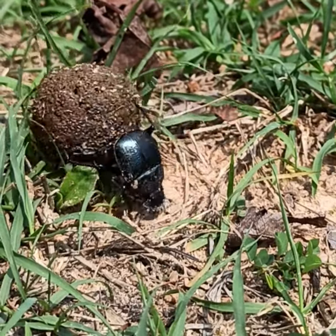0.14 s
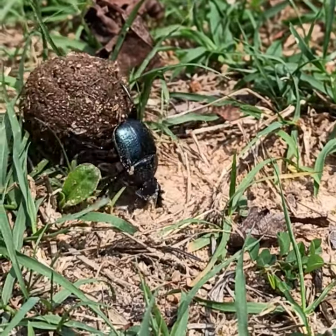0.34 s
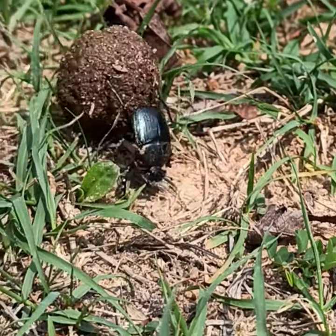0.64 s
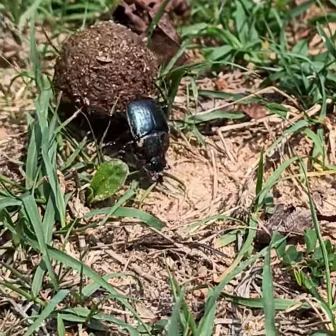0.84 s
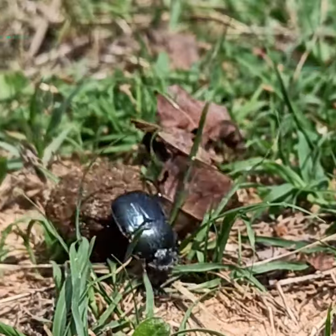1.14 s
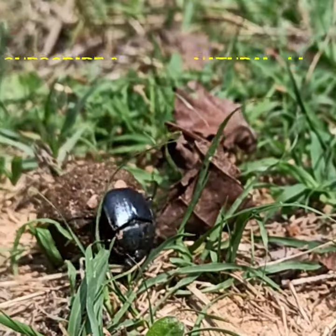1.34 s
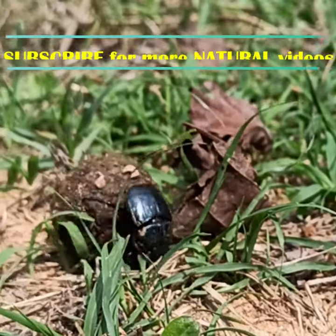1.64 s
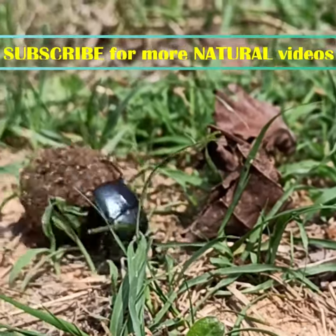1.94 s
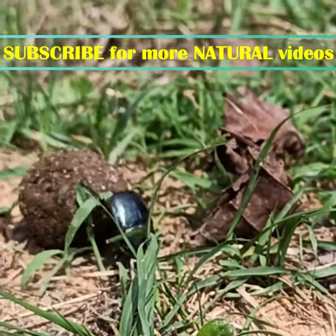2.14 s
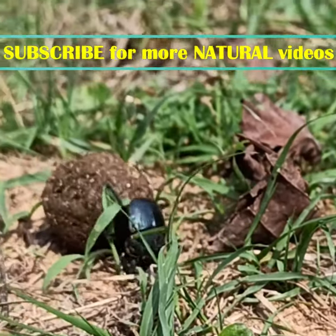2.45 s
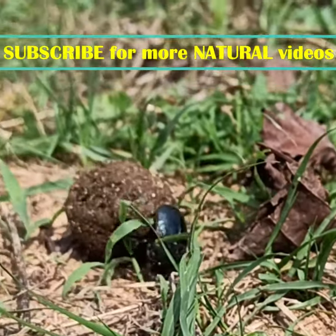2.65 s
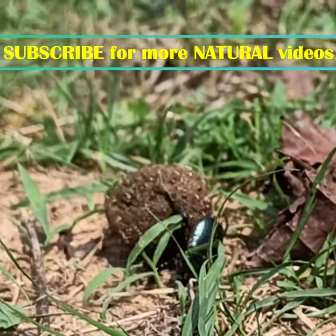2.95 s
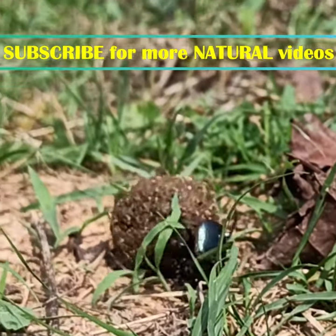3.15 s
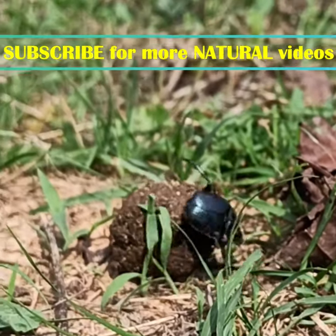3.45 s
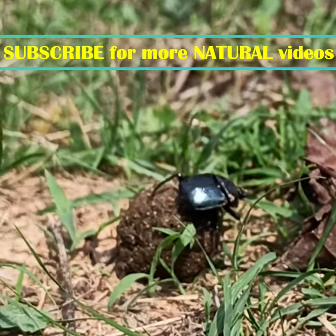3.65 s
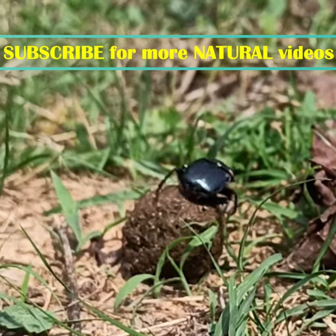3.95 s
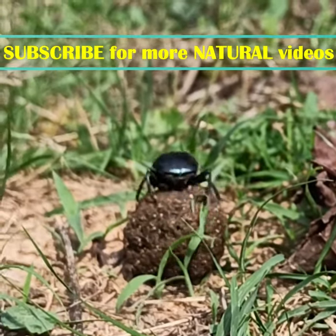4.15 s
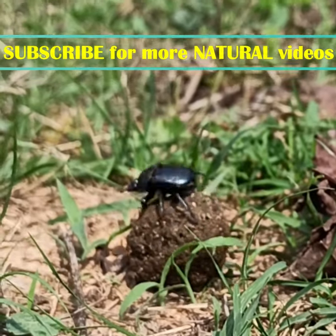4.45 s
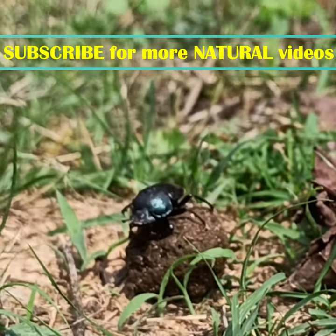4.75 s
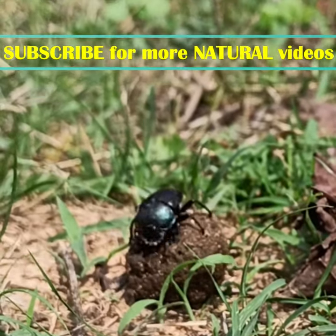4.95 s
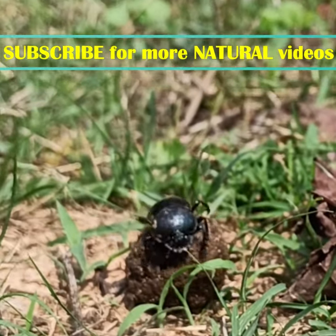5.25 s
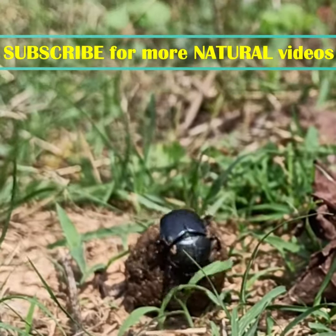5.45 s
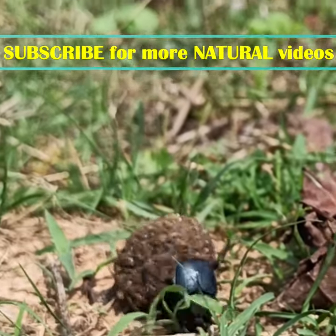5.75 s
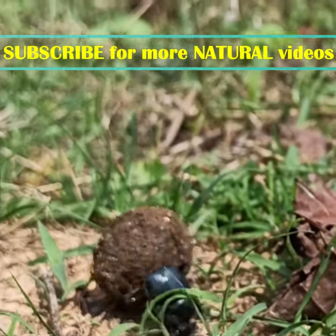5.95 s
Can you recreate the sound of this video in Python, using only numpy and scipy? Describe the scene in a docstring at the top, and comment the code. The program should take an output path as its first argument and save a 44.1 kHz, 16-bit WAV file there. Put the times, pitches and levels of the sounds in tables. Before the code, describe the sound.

A daytime grassy field heard by a small microphone near the ground, as a beetle rolls a ball of dung through dry blades. A faint steady hiss, lumpy low wind and a chorus of tiny far chirps continue throughout; nearer birds add short gliding whistles. From 0.3 to 1 second an insect hums by, low and sinking, with tiny grass ticks. A crack comes at 1.4, more from 2 seconds, clustering around 2.4 to 2.6 with rustle. Near 3.3 a bright tick and a very sharp, ringing snap are the loudest moment. Light ticks follow, with a soft low bump at 3.8. From 4.05 to 4.9 crackling and scraping thicken, strongest at 4.64 and 4.82, with dull rubs. After a lull near 5.2, another crackling burst comes at 5.4 to 5.65. Birds continue, and a faint hum returns from 5.9 to the end.

```python
"""A grassy field by day, heard by a small microphone held near the ground.
Far birds whistle and chirp as gliding sines; dry grass rustles as clouds of filtered clicks and noise.
Stalks tick and blades crack as struck resonances; an insect hums past twice on a few harmonics.
Light wind rumbles as lumpy low noise over the field's hiss; the hand bumps the housing; dull rubs pass.
The microphone port's ring near 3 kHz colours the rustle, the cracks and the farther birds."""
import sys
import numpy as np
from scipy import signal
from scipy.io import wavfile
from scipy.ndimage import uniform_filter1d

SR = 44100
rng = np.random.default_rng(int(sys.argv[2]) if len(sys.argv) > 2 else 0)


def store_wav(level_fs):
    """Save 16-bit WAV to argv[1]."""
    pcm = np.round(np.clip(np.atleast_2d(level_fs), -1, 1) * 32767)
    wavfile.write(sys.argv[1], SR, pcm.T.astype(np.int16))


N = 268569

# How the grass moves. Each row: time in seconds, rustle level in dB, treble level in dB.
GRASS_MOTION = [(0, -61, -86), (.3, -65, -88.5), (.8, -61, -82.5), (1.25, -57, -81), (1.66, -63, -80.5),
                (2.09, -56.5, -82), (2.38, -58, -82.5), (2.53, -50, -75), (2.7, -61, -80), (3, -59, -80.5),
                (3.34, -51.5, -72), (3.53, -60, -76), (3.8, -54.5, -77.5), (4, -60, -80), (4.2, -57, -73),
                (4.56, -60.5, -78), (4.75, -54, -69), (4.9, -53.5, -76.5), (5.11, -64, -86),
                (5.34, -60, -83), (5.51, -52, -68), (5.8, -57.5, -77), (5.95, -53.5, -75),
                (6.09, -60, -82.5)]
# Grass heard through the port's ring. Each row: frequency in Hz, gain in dB.
PORT_SPECTRUM = [(530, -35), (900, -16.5), (1350, -22.5), (1480, -24.5), (1990, -10.5), (2790, 1.5),
                 (3220, 2), (4280, -13.5), (4680, -44.5), (5400, -57), (7020, -60), (11900, -120)]
# Treble of the grass. Each row: frequency in Hz, gain in dB.
SHEEN_SPECTRUM = [(3060, -26), (5200, -12), (5990, -8), (7040, 2.5), (8100, -2), (9520, 2), (10900, 0),
                  (12800, -8.5), (15700, -24), (16200, -30), (16700, -36)]


def gain_of(db):
    """Turns decibels into gain."""
    return 10 ** (np.asarray(db) / 20)


def evened(x):
    """Scales to rms 1."""
    return x / np.sqrt(np.mean(x ** 2) + 1e-20)


def peaked(x):
    """Scales to peak 1."""
    return x / (abs(x).max() + 1e-20)


def add(mix, s, sound):
    """Mixes a sound in at s seconds."""
    part = mix[max(round(s * SR), 0):][:len(sound)]
    part += sound[:len(part)]


def colour(points, size=4096):
    """Makes causal, minimum-phase filter taps with the given spectrum."""
    f, db = np.transpose(points)
    hz = abs(np.fft.fftfreq(size, 1 / SR))
    shape_db = np.interp(np.log(hz + 1), np.log(f), db)
    log_gain = np.log(gain_of(np.maximum(shape_db, -100)))
    spectrum = np.exp(np.conj(signal.hilbert(log_gain)))
    return np.fft.ifft(spectrum).real[:size // 2]


def through(x, taps):
    """Filters and keeps the length."""
    return signal.oaconvolve(x, taps)[:len(x)]


def ring(x, hz, width_hz):
    """Passes a sound through one resonance."""
    return signal.lfilter(*signal.iirpeak(hz, hz / width_hz, SR), x)


def smoothed(x, cutoff_hz):
    """Keeps only the slow movement of a signal."""
    return signal.sosfilt(signal.butter(2, cutoff_hz, fs=SR, output="sos"), x)


def curve(rows, column):
    """Reads a column of a table at every sample."""
    rows = np.asarray(rows)
    return np.interp(np.arange(N) / SR, rows[:, 0], rows[:, column])


def hiss(points, patchy_db):
    """Noise of a given spectrum whose loudness drifts in patches of time and pitch."""
    f, db = np.transpose(points)
    hz = np.fft.rfftfreq(1024, 1 / SR)
    a, b, patches = rng.standard_normal((N // 256 + 5, 513, 3)).T
    patches = uniform_filter1d(patches, size=12, axis=0)  # across pitch
    patches = evened(uniform_filter1d(patches, size=12, axis=1))  # across time
    shape_db = np.interp(np.log(hz + 1), np.log(f), db)[:, None] + patchy_db * patches
    frames = (a + 1j * b) * gain_of(shape_db)
    return evened(signal.istft(frames, nperseg=1024, noverlap=768)[1][:N])


def grains(per_s, spread_db):
    """Sparse clicks of random sign, a few of them large."""
    size = gain_of(spread_db * np.minimum(rng.exponential(1, N), 4))
    present = rng.random(N) < per_s / SR
    return evened(size * rng.standard_normal(N) * present)


def grain(points, lo_hz, hi_hz, width_hz, per_s, spread_db, blur, count=6):
    """Clicks of many blades, each kind with its own pitch, over a blur of farther ones."""
    near = np.zeros(N)
    for hz in np.geomspace(lo_hz, hi_hz, count):
        near += evened(ring(grains(per_s / count, spread_db), hz, width_hz))
    near = evened(through(near, colour(points)))
    return evened(near + blur * hiss(points, patchy_db=3.5))


def scattered(column, ranges, count):
    """Small events at chance moments, more where the grass moves most; values drawn within ranges."""
    draw = rng.random((count, 1 + len(ranges)))
    lo, hi = np.transpose(ranges)
    busy = np.cumsum(gain_of(curve(GRASS_MOTION, column)) ** 3)
    times = np.searchsorted(busy / busy[-1], draw[:, 0]) / SR
    return np.c_[times, lo + (hi - lo) * draw[:, 1:]]


def field_air(level_db=-62.5):
    """Far hiss of the field: steady noise with gently drifting patches."""
    # Each row: frequency in Hz, gain in dB.
    air_spectrum = [(59, -58), (100, -3.5), (702, -10), (1330, -11.5), (1980, -7), (2450, 0), (2900, -9.5),
                    (3660, -17.5), (4820, -26), (6770, -25), (9500, -32), (15800, -36)]
    return gain_of(level_db) * hiss(air_spectrum, patchy_db=1.42)


def wind(lumps_hz=4.6, lumps_db=2.5):
    """Lumpy low pressure on the membrane: a slow level with quick chance lumps on it."""
    # Each row: time in seconds, level in dB before the lumps.
    wind_levels = [(0, -69.5), (.25, -72), (.45, -67.5), (.75, -67), (1.07, -72.5), (1.3, -66.5),
                   (2.3, -69), (2.65, -73), (2.8, -70), (3.3, -74), (3.5, -67.5), (4.2, -67.5), (4.35, -71),
                   (4.5, -65), (4.9, -68), (5.2, -67.5), (5.35, -70.5), (6.09, -71.5)]
    # Each row: frequency in Hz, gain in dB.
    gust_spectrum = [(18, -43), (30, -20), (50, 1), (81, 3.5), (97, -5.5), (119, -12), (196, -12.5),
                     (277, -14), (400, -21), (520, -41), (880, -120)]
    lumps = evened(smoothed(rng.standard_normal(N), lumps_hz))
    level_db = curve(wind_levels, column=1) + lumps_db * lumps
    return gain_of(level_db) * hiss(gust_spectrum, patchy_db=-0.5)


def birds(echo_db=-1.5, t60=1.0, scatter=0.02, flutter=1.0, flutter_hz=45.0, echo_hz=2000.0):
    """Gliding sines flutter in moving air; leaves scatter the first arrival and echo the high notes."""
    # Each row: start in seconds, length in seconds, first and last pitch in Hz,
    # level in dB with the note's own flutter, before the fades and the echo.
    whistles = [(0, .2, 2400, 2362, -55.5), (0.061, 0.097, 1760, 1950, -69),
                (0.195, 0.062, 2620, 2350, -56), (0.182, 0.043, 2845, 3000, -55),
                (0.356, 0.035, 2960, 2800, -54), (.615, 0.048, 3690, 4610, -74),
                (.732, 0.033, 2200, 2406, -62), (0.766, 0.026, 3200, 2654, -55),
                (.803, 0.043, 2944, 2760, -64), (.98, .08, 3250, 3170, -65), (1.111, .072, 1990, 2096, -63),
                (1.16, 0.16, 2540, 2410, -62), (1.273, 0.046, 1500, 1450, -58.5),
                (1.327, 0.02, 1525, 1580, -59), (1.406, .054, 2630, 2696, -58),
                (1.516, .21, 3650, 3720, -64.5), (1.64, .08, 2750, 2880, -59), (1.775, .1, 2815, 3075, -65),
                (2.107, 0.05, 2110, 2030, -63), (2.231, 0.077, 2180, 2100, -57),
                (2.292, 0.062, 1910, 1880, -61.5), (2.45, 0.11, 1860, 1825, -67),
                (2.705, 0.16, 1950, 2502, -52.5), (2.877, 0.039, 2524, 2834, -52),
                (2.987, .042, 5560, 6040, -79), (3.42, .12, 2497, 2520, -62),
                (3.647, 0.045, 5900, 6700, -75), (3.695, .26, 4023, 3567, -58),
                (3.86, .097, 2270, 2200, -64), (3.968, 0.067, 3760, 3720, -67),
                (4.022, .035, 7140, 6900, -83), (4.035, 0.031, 3330, 2980, -51.5),
                (4.663, .045, 1390, 1536, -60), (4.689, .05, 2230, 2270, -60),
                (4.84, 0.029, 2190, 2220, -49.5), (4.903, 0.14, 3670, 3780, -70.5),
                (5.023, 0.029, 2780, 2750, -53), (5.27, 0.087, 2200, 2136, -63),
                (5.316, 0.042, 7550, 6080, -74), (5.343, 0.068, 2010, 1967, -58.5),
                (5.6, 0.21, 1857, 1886, -71.5), (5.66, 0.058, 3130, 3245, -53.5),
                (5.775, .14, 1950, 2444, -55), (5.917, .13, 2367, 2467, -57.5),
                (6.06, 0.034, 6880, 7150, -74)]
    rise_s = .023  # time constant of a rising note; a falling one slides over its whole length
    dry = np.zeros(N)
    noises = rng.standard_normal((len(whistles), 2, SR // 2))
    for (s, length, first_hz, last_hz, db), (a, b) in zip(whistles, noises):
        t = np.arange(0, length, 1 / SR)
        glide = np.exp(-t / rise_s) if last_hz > first_hz else 1 - t / length
        hz = last_hz + (first_hz - last_hz) * glide
        wander = smoothed(a + 1j * b, flutter_hz)[-len(t):]
        wander /= np.sqrt(np.mean(abs(wander) ** 2))
        path = 1 + flutter * wander  # a direct path plus a wandering one
        note = evened((path * np.exp(2j * np.pi * np.cumsum(hz) / SR)).real)
        add(dry, s, gain_of(db) * note * signal.windows.tukey(len(t), .3))
    t = np.arange(SR) / SR
    near = rng.standard_normal(SR) * np.exp(-t / scatter)
    tail = rng.standard_normal(SR) * gain_of(-60 * t / t60)
    high_pass = signal.butter(4, echo_hz, "highpass", fs=SR, output="sos")
    tail = signal.sosfilt(high_pass, tail / np.linalg.norm(tail))
    sway = evened(smoothed(rng.standard_normal(N), flutter_hz))  # moving leaves blur the echo
    first = dry + through(dry, 0.74 * near / np.linalg.norm(near))
    return first + gain_of(echo_db) * sway * through(dry, tail)


def chorus(level_db=-65.5, shortest=0.019, longest=0.04, sweep=0.1005, count=600):
    """Farther birds: many faint short chirps of chance pitch, heard through the port's ring."""
    out = np.zeros(N)
    for when, pitch, length, bend, size in rng.random((count, 5)):
        t = np.arange(0, shortest + (longest - shortest) * length, 1 / SR)
        middle_hz = 1900 * (4000 / 1900) ** pitch
        hz = middle_hz * (1 + sweep * (2 * bend - 1) * t / t[-1])
        chirp = np.hanning(len(t)) * np.sin(2 * np.pi * np.cumsum(hz) / SR)
        add(out, when * N / SR, gain_of(-8 * size) * chirp)
    return gain_of(level_db) * evened(through(out, colour(PORT_SPECTRUM)))


def rustle():
    """A slow rustle follows the motion; scrapes are short swells of the same grain with a lower body."""
    # Blades dragged past each other. Each row: start in seconds, length in seconds,
    # ring level in dB, treble level in dB, low body level in dB.
    drags = [(0.732, .02, -59, -69.5, -78), (0.93, 0.094, -61, -76, -93), (1.522, 0.022, -75, -71, -79),
             (1.582, .092, -56, -81, -91), (2.32, 0.11, -53.5, -76, -90), (2.422, 0.067, -51.5, -73, -89),
             (3.163, 0.023, -72, -71, -58.5), (3.2, 0.051, -59, -67, -86), (3.321, .015, -57, -59, -80),
             (4.049, 0.056, -51, -61.5, -89), (4.102, 0.054, -51.5, -65, -77),
             (4.233, 0.086, -56, -69, -73), (4.379, 0.025, -54, -65, -69), (4.493, 0.046, -53.5, -67, -80),
             (4.526, 0.05, -54, -76, -64.5), (4.635, 0.023, -33, -51, -47), (4.646, .03, -45.5, -70, -62),
             (4.718, 0.031, -55, -55, -66), (4.742, .022, -41.5, -59.5, -62),
             (4.778, .013, -49, -59, -61.5), (4.816, 0.028, -39.5, -69, -52),
             (4.891, 0.018, -52, -67, -60.5), (4.902, 0.035, -67, -96, -63), (5.401, 0.061, -50, -62, -64),
             (5.449, .033, -50.5, -65, -68), (5.596, 0.07, -66, -71, -77), (5.555, 0.019, -44, -62, -56.5)]
    body_hz = 1530
    power = gain_of([curve(GRASS_MOTION, column=1), curve(GRASS_MOTION, column=2)]) ** 2
    low = np.zeros(N)
    rub = grains(per_s=3000, spread_db=0.5)
    for s, length, db, treble_db, low_db in drags:
        swell = signal.windows.tukey(round(length * SR), .45)
        add(power[0], s, (gain_of(db) * swell) ** 2)
        add(power[1], s, (gain_of(treble_db) * swell) ** 2)
        part = rub[round(s * SR):][:len(swell)] * swell
        part = np.pad(part, (0, 600))  # room to ring out
        body = ring(ring(part, body_hz, width_hz=1500), body_hz, width_hz=1500)
        add(low, s, gain_of(low_db) * evened(body))
    ringing = grain(PORT_SPECTRUM, 1500, 4540, width_hz=780, per_s=3000, spread_db=2.5, blur=0.75)
    treble = grain(SHEEN_SPECTRUM, 4850, 14400, width_hz=1200, per_s=3000, spread_db=3.0, blur=0.9)
    return low + (np.sqrt(power) * [ringing, treble]).sum(axis=0)


def ticks(width_hz=2200, overtone=1.56, lag=0.00072):
    """A thin stalk's snap rings briefly at its own pitch; a near one adds an overtone and a wide click."""
    # Each row: time in seconds (the snap follows after a short fixed lag), peak in dB,
    # pitch in Hz, nearness as a share of wide click.
    snaps = [(.7374, -50, 7430, 0.37), (.802, -42.5, 6860, 0.91), (.9457, -53, 7420, .4),
             (1.1772, -56, 8800, .5), (1.5252, -53, 9500, .4), (1.541, -54, 11000, .5),
             (1.558, -58, 7000, .9), (1.599, -60, 10500, .4), (1.6217, -52, 11100, .4),
             (1.643, -44.5, 9800, 0.36), (1.7788, -42, 8800, 1), (2.097, -54, 6240, .8),
             (2.4458, -56, 6640, 0.55), (2.5097, -52, 9500, .3), (2.603, -43.5, 9900, .3),
             (2.617, -43.5, 8800, .3), (2.6369, -55, 9790, .3), (2.6696, -48.5, 9800, .4),
             (2.6854, -54, 11200, .3), (2.856, -55, 9800, .3), (3.2956, -19, 6800, 1),
             (3.5507, -47.5, 9500, .4), (3.651, -48, 9000, .4), (3.6773, -40, 10100, .3),
             (3.7494, -50, 10000, .3), (3.912, -55, 10500, .3), (3.922, -58, 10000, .3),
             (3.958, -60, 9900, .2), (4.7226, -42, 10300, .4), (4.73, -48, 10100, .4),
             (4.7346, -48, 9420, .4), (5.3018, -53, 6600, .4), (5.399, -51, 11100, .4),
             (5.7144, -50, 6630, .3), (5.8272, -48, 10400, .4)]
    # Ranges for the chance ticks: peak in dB, pitch in Hz, nearness as a share.
    small_ranges = (-66, -56), (6200, 11500), (-0.3, .5)
    t60 = 0.0043  # seconds, of the snap's noise
    out, t = np.zeros(N), np.arange(1500) / SR
    band = signal.butter(1, (350, 15000), "bandpass", fs=SR)
    rows = np.r_[snaps, scattered(column=2, ranges=small_ranges, count=110)]
    for (s, db, hz, near), noise in zip(rows, rng.standard_normal((len(rows), 1500))):
        burst = 0.084 * noise * gain_of(-60 * t / t60)
        snap = signal.lfilter(*band, burst + (t == 0))
        click = peaked(snap + 1.6 * ring(snap, 3500.0, width_hz=1400))
        upper = peaked(ring(snap, min(overtone * hz, 15000), width_hz))
        wide = click + 0.78 * upper
        pitched = peaked(ring(ring(snap, hz, width_hz), hz, 2 * width_hz))
        add(out, s + lag, gain_of(db) * peaked(pitched + near * wide))
    return out


def wings():
    """A flying insect passes twice: a low hum of a few harmonics whose pitch mostly sinks."""
    # One table a pass. Each row: time in seconds, wing beat in Hz, level in dB.
    passes = [
        [(.32, 204, -75), (.38, 203.5, -68.5), (.5, 200.6, -73.5), (.6, 185.3, -72), (.8, 172.7, -78),
         (.97, 157.5, -69), (1.02, 163, -91)],
        [(5.88, 154.6, -69), (5.95, 152.4, -69.5), (6.09, 140.7, -68.5)],
    ]
    # Each row: multiple of the wing beat, level in dB against the other multiples.
    harmonics = [(1, -3), (2, -7), (3, -12)]
    out, t = np.zeros(N), np.arange(N) / SR
    for rows in passes:
        turns = np.cumsum(curve(rows, column=1)) / SR
        level = gain_of(curve(rows, column=2))
        near = (t > rows[0][0]) & (t < rows[-1][0])
        hum = sum(gain_of(db) * np.sin(2 * np.pi * k * turns) for k, db in harmonics)
        out += near * level * evened(hum)
    return out


def bumps(sag=0.46, rise=0.0022):
    """A soft push of the hand on the housing: low cycles whose pitch drops after the first."""
    # Each row: start in seconds, peak in dB, middle of the falling pitch in Hz.
    pushes = [(.383, -49.5, 75), (1.167, -54, 152), (1.393, -53, 88), (1.901, -51.5, 73), (2.179, -54, 92),
              (2.414, -55.5, 84.4), (2.697, -54, 78.1), (3.617, -55, 122), (3.766, -44, 246),
              (4.201, -50, 95), (4.748, -53.5, 88.8), (4.998, -54, 93), (5.122, -53, 75.4),
              (5.521, -57, 150), (5.563, -54, 150), (5.638, -49, 132)]
    decay_cycles = 4.9  # cycles of the middle pitch until 60 dB are lost
    out, t = np.zeros(N), np.arange(8000) / SR
    for s, db, hz in pushes:
        turns = np.cumsum(hz * (1 - sag + 2 * sag * np.exp(-t * hz))) / SR
        swell = (1 - np.exp(-t / rise)) * gain_of(-60 * t * hz / decay_cycles)
        add(out, s, gain_of(db) * peaked(swell * np.sin(2 * np.pi * turns)))
    return out


def cracks(width_hz=750, broad=0.37, slips=0.3, strain=.0009, treble_speed=1.75,
           treble_lift_db=-1.5, low_hz=1100):
    """A dry blade creaks under strain, breaks sharply and goes on slipping; blade and port ring with it."""
    # Each row: start in seconds, peak of the ring in dB, ring in Hz,
    # treble before the common lift and low part, both in dB against the ring.
    breaks = [(1.3654, -34.5, 2800, -24, -20), (1.9942, -38, 3100, -34, -20),
              (2.0552, -38.5, 2800, -23, -32), (2.1811, -29.5, 3150, -21, -46), (2.36, -38, 3080, -16, -34),
              (2.4016, -37.5, 2920, -26, -29), (2.4623, -36, 3170, -18, -39), (2.4828, -32, 3240, -19, -39),
              (2.531, -46, 3010, -35, -34), (2.5532, -36.5, 3070, -32, -35), (2.5765, -39, 3180, -22, -33),
              (2.6155, -42, 3340, -12, -27), (3.0051, -40, 3330, -17, -29), (3.1792, -28, 2820, -21, -23),
              (3.211, -34, 3180, -27, -40), (3.3235, -14.5, 3060, -23, -41), (3.3284, -32, 3340, -31, -33),
              (3.3454, -37, 3330, -30, -25), (3.3779, -27.5, 2890, -37, -46), (3.703, -42.5, 3360, -6, -32),
              (3.7392, -38.5, 3050, -26, -14), (3.783, -34, 3040, -33, -34), (3.7955, -27, 3040, -23, -42),
              (4.0554, -35, 3170, -29, -33), (4.0614, -33, 3400, -21, -32), (4.0803, -34, 2800, -4, -35),
              (4.0994, -36.5, 3150, -18, -30), (4.1118, -39, 2850, -22, -32),
              (4.132, -27.5, 3030, -19, -18), (4.1424, -38, 2710, -30, -32), (4.2266, -38, 2970, -30, -12),
              (4.3036, -39.5, 2860, -26, -37), (4.327, -39, 2900, -11, -32), (4.346, -34, 2840, -30, -29),
              (4.3656, -31, 2670, -38, -40), (4.3764, -39, 2780, -11, -31), (4.3924, -35, 3400, -5, -17),
              (4.4094, -39, 2740, -13, -30), (4.4831, -34, 3030, -6.5, -34), (4.6273, -38, 2630, -26, -14),
              (4.6378, -25, 2500, -29, -34), (4.6415, -27.5, 3140, -19, -8.5), (4.647, -23, 2540, -19, -23),
              (4.743, -34, 3120, -11, -28), (4.7494, -36, 3220, -23, -25), (4.7569, -38, 3360, -7, -30),
              (4.7844, -41, 2170, -12, -18), (4.8228, -18, 2080, -16, -17.5), (4.8344, -41, 3080, -37, -27),
              (4.8618, -47, 2200, -26, -29), (4.8744, -38, 1970, -14, -15), (5.0943, -38, 3200, -39, -30),
              (5.4263, -32.5, 2720, -30, -33), (5.433, -30, 3180, -20, -28),
              (5.4999, -31, 3160, -10.5, -9.5), (5.5124, -33, 2920, -8, -17), (5.5274, -42, 2230, -18, -24),
              (5.5424, -38, 2200, -24, -14), (5.5616, -32.5, 2680, -28, -11),
              (5.6295, -34.5, 2900, -7.5, -6), (5.736, -40, 3120, -27, -26)]
    # Ranges for the chance cracks: peak in dB, ring in Hz, treble in dB, low part in dB.
    small_ranges = (-53, -41), (2403, 3400), (-43, -6), (-35, -10)
    t60 = 0.021  # seconds, of the slipping
    out, t = np.zeros(N), np.arange(2500) / SR
    port, sheen = colour(PORT_SPECTRUM), colour(SHEEN_SPECTRUM)
    dip = signal.butter(4, 4150., fs=SR, output="sos")  # the port passes little just above its ring
    rows = np.r_[breaks, scattered(column=2, ranges=small_ranges, count=24)]
    fade = np.minimum(t / strain, gain_of(-60 * (t - strain) / t60))
    snap = 2.7 * (np.arange(2500) == round(.6 * strain * SR))
    for (s, db, hz, treble_db, low_db), (a, b) in zip(rows, rng.standard_normal((len(rows), 2, 2500))):
        drive = slips * a * fade + np.sign(a[0]) * snap
        blade = ring(ring(drive, hz, width_hz), hz, width_hz)
        body = peaked(signal.sosfilt(dip, blade)) + broad * peaked(through(drive, port))
        treble = peaked(through(b * fade ** treble_speed, sheen))
        low = ring(ring(drive, low_hz, width_hz=3200), low_hz, width_hz=3200)
        low = peaked(signal.sosfilt(dip, low))
        crack = peaked(body) + gain_of(treble_db + treble_lift_db) * treble + gain_of(low_db) * low
        add(out, s, gain_of(db) * crack)
    return out


def scuff(width=1.4):
    """Dense grainy rubs, each with a dull, broad body."""
    # Each row: start in seconds, length in seconds, level in dB before the fades, pitch in Hz.
    rubs = [(4.638, 0.038, -60, 765), (4.829, .03, -66, 900), (5.516, 0.105, -61.5, 330),
            (5.607, 0.073, -60, 467)]
    out, rub = np.zeros(N), grains(per_s=1500, spread_db=2.5)
    for s, length, db, hz in rubs:
        swell = signal.windows.tukey(round(length * SR), .5)
        part = rub[round(s * SR):][:len(swell)]
        body = ring(ring(part, hz, width * hz), hz, width * hz)
        add(out, s, gain_of(db) * swell * evened(body))
    return out


def scene():
    """Sums all sources at the microphone, one channel."""
    field = field_air() + wind() + birds() + chorus() + wings()
    grass = rustle() + ticks() + cracks()
    thuds_and_rubs = bumps() + scuff()
    return (field + grass + thuds_and_rubs)[None]


def record(dry):
    """The microphone loses the deepest bass; then the band limit."""
    high_pass = signal.butter(3, 42., "highpass", fs=SR, output="sos")
    bass_cut = signal.sosfilt(high_pass, dry)
    band_limit = signal.firwin(511, 16800, window=("kaiser", 9), fs=SR)  # low-pass edge in Hz
    return signal.oaconvolve(bass_cut, band_limit[None], "same")


dry = scene()
out = record(dry)
store_wav(out)
```